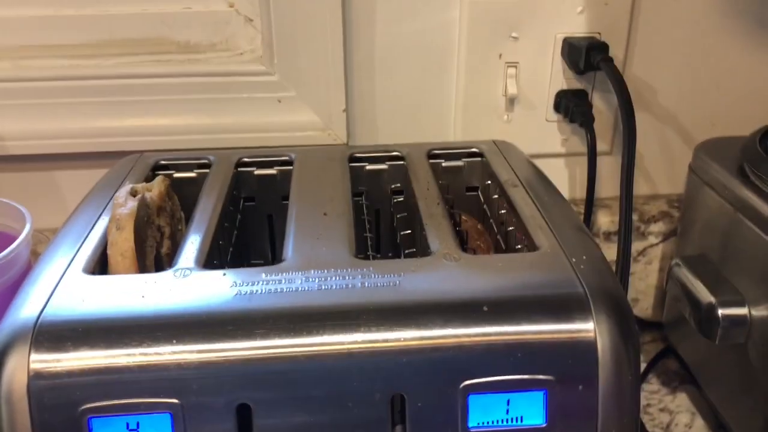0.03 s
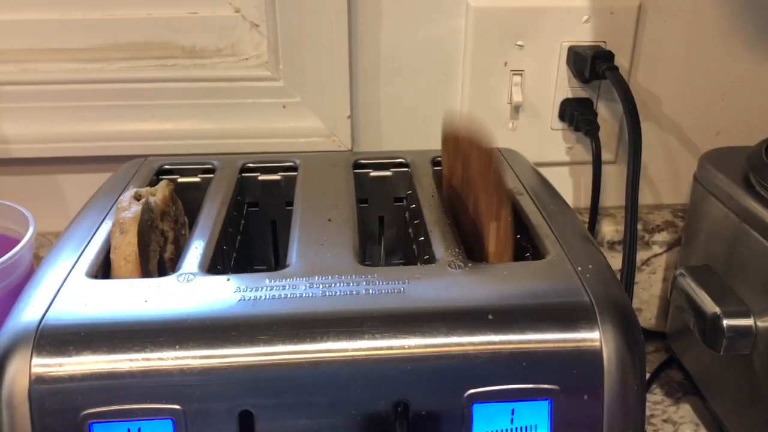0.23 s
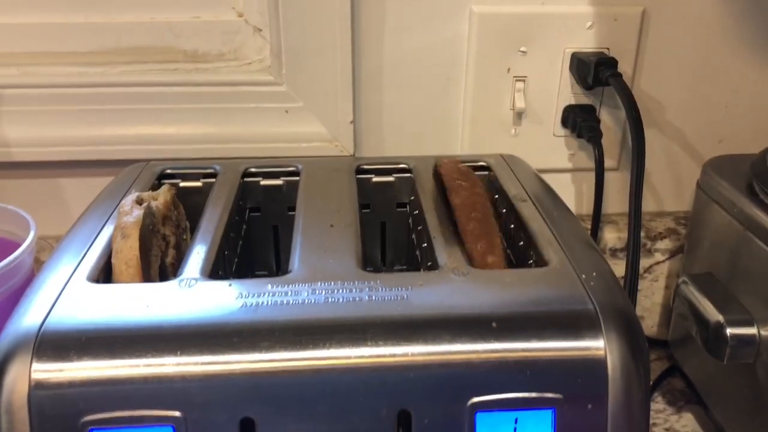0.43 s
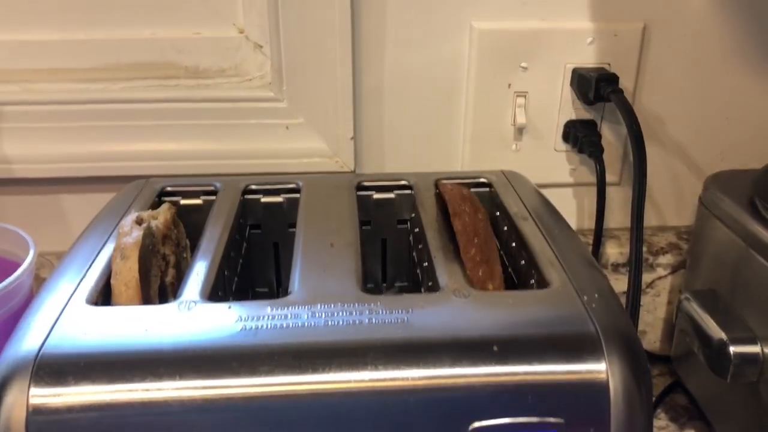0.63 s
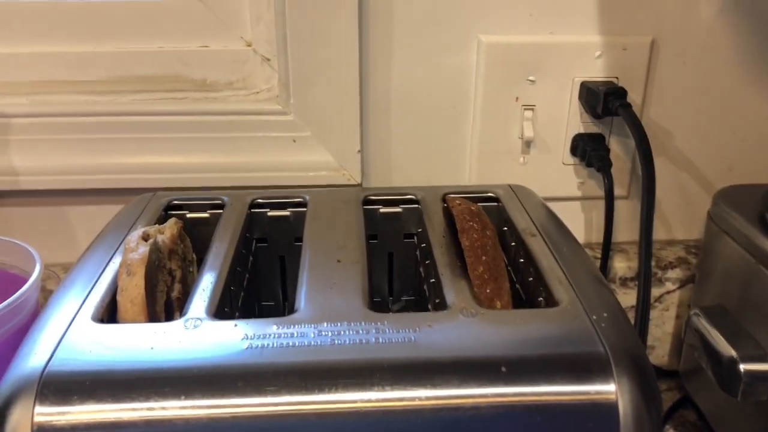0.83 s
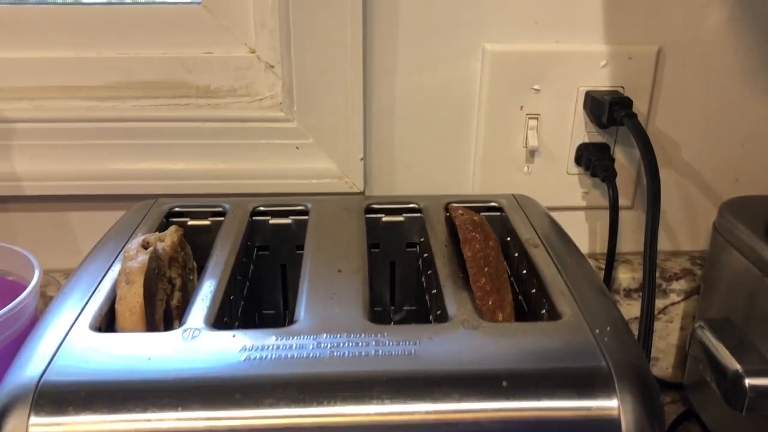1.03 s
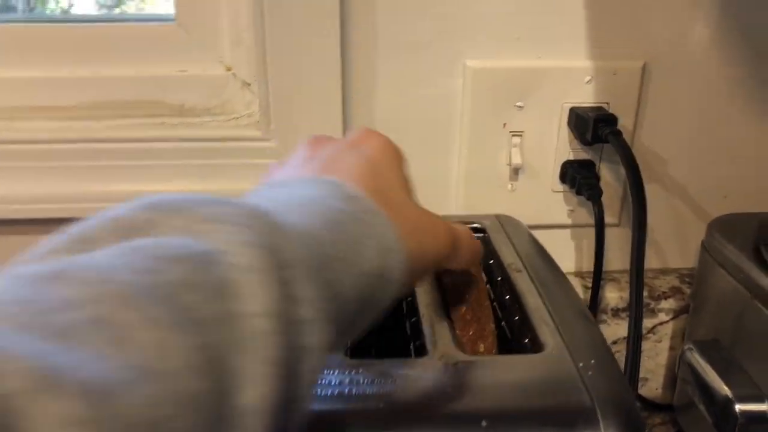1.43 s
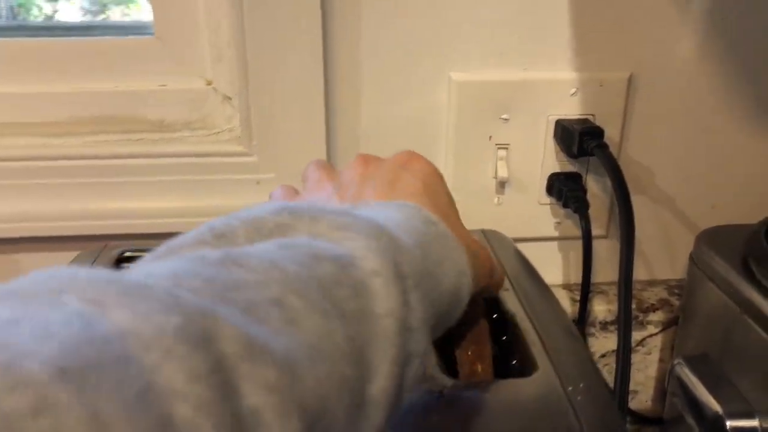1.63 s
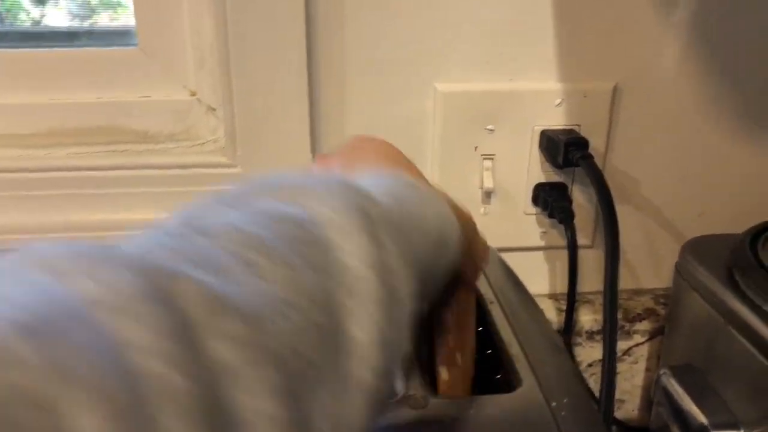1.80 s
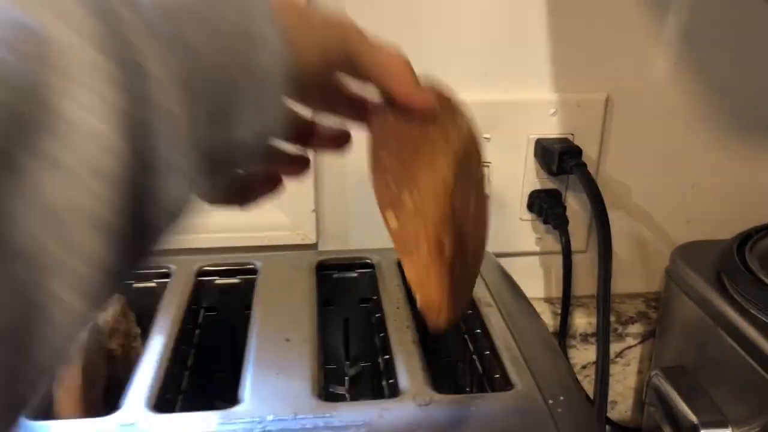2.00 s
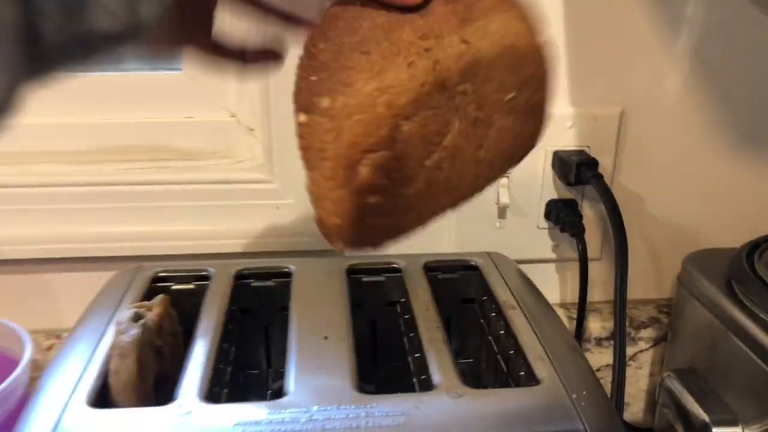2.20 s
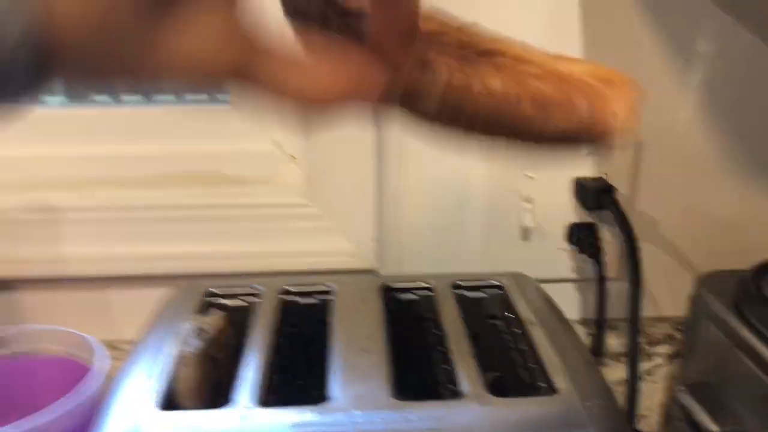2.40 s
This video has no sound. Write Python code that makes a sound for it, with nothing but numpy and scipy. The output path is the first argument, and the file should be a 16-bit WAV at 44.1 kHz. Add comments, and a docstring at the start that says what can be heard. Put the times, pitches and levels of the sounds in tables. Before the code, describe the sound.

A pop-up toaster clicks and clatters, followed by light scraping as toast is removed.

```python
"""A steel pop-up toaster pops in a quiet kitchen. The latch clicks, the sprung carriage shoots up,
hits its stop and bounces, and the slice drops back on the rack. Each contact is a crack and a dying
chatter that set the case and wires ringing. After a few soft bumps and a faint high whistle, the toast
is pulled out, scraping along the slot. A low rumble, a hum and a hiss lie underneath."""
import sys
import numpy as np
from scipy import signal
from scipy.fft import rfft, irfft, next_fast_len
from scipy.io import wavfile

SR = 44100
rng = np.random.default_rng(int(sys.argv[2]) if len(sys.argv) > 2 else 0)


def store_pcm(level_fs):
    """Save levels as 16-bit WAV."""
    pcm = np.round(np.clip(level_fs, -1, 1) * 32767).astype(np.int16)
    wavfile.write(sys.argv[1], SR, np.atleast_2d(pcm).T)


N = 112454
TIME = np.arange(N) / SR


def from_db(db):
    return 10 ** (np.asarray(db) / 20)


def at_pitch(points, hz):
    """Read between a table's rows, giving every octave equal room."""
    pitches, values = np.transpose(points)
    return np.interp(np.log(np.maximum(hz, 1)), np.log(pitches), values)


def unit_energy(x):
    return x / np.sqrt(np.sum(x ** 2) + 1e-20)


def swell(t, rise_s, fade_s):
    """Rise in a straight line, then fall 60 dB every fade_s."""
    return np.clip(t / max(rise_s, 1e-5), 0, 1) * from_db(-60 * np.maximum(t - rise_s, 0) / fade_s)


def shape_tone(x, points):
    """Turn lows and highs up or down along (pitch_hz, gain_db) points."""
    n = 2 * next_fast_len(len(x))
    gain = from_db(at_pitch(points, np.fft.rfftfreq(n, 1 / SR)))
    cepstrum = irfft(np.log(gain))
    # minimum phase: nothing rings before the hit
    cepstrum[1:n // 2] *= 2
    cepstrum[n // 2 + 1:] = 0
    return irfft(rfft(x, n) * np.exp(rfft(cepstrum)))[:len(x)]


# tone of the room's rumble and hiss: pitch_hz, gain_db
RUMBLE_TONE = [(20, -16.5), (45, -11), (70, -8), (100, -1), (140, -7.5), (200, -4.5), (240, -7), (275, -16),
               (335, -2.5), (480, -14.5), (700, -18), (1500, -26.5), (3000, -32), (8000, -37.5),
               (15500, -41.5)]
HISS_TONE = [(500, -11.5), (2000, 0), (5000, 2), (10000, 0), (13000, 1), (16000, -0.5)]
# the hiss over time: time_s, level_db
HISS_LEVELS = [(0, -91), (.2, -78), (.9, -75), (1.15, -75.5), (1.5, -73.5), (1.7, -73.5), (2.2, -74.5),
               (2.55, -75)]

def room_tone(rumble_db=-37, hum_hz=246, hum_db=-69):
    """Low rumble, a weak mains hum, and a hiss that is a little stronger after the pop."""
    rumble = from_db(rumble_db) * shape_tone(rng.standard_normal(N), RUMBLE_TONE)
    hiss_db = np.interp(TIME, *np.transpose(HISS_LEVELS))
    hiss = from_db(hiss_db) * shape_tone(rng.standard_normal(N), HISS_TONE)
    hum = from_db(hum_db) * np.sqrt(2) * np.sin(2 * np.pi * hum_hz * TIME)
    return rumble + hiss + hum


# the six pitches, low to high, at which a contact's levels are set: pitch_hz
CONTACT_PITCHES = [90, 300, 1300, 3000, 6000, 12000]

def contacts(rows, crack, rough_db, size=16384):
    """The push of parts meeting: one sharp crack inside a burst of tiny, uneven hits."""
    out = np.zeros(N + size)
    for start_s, rise_s, fade_s, *levels in rows:
        envelope = swell(TIME[:size], rise_s, fade_s)
        force = envelope * rng.standard_normal(size) / 2
        force *= from_db(rough_db * np.minimum(rng.exponential(1, size), 4))
        force[int(rise_s * SR) + 1] += crack
        force = unit_energy(force) * np.linalg.norm(envelope)
        start = int(start_s * SR)
        out[start:start + size] += shape_tone(force, list(zip(CONTACT_PITCHES, levels)))
    return out[:N]


def ringing_note(t, pitch_hz, boost_db, fade_s):
    """A dying note that boosts a push at its own pitch by boost_db."""
    rate = np.log(1000) / fade_s
    return from_db(boost_db) * 2 * rate / SR * np.exp(-rate * t) * np.sin(2 * np.pi * pitch_hz * t)


def dense_ring(t, levels, fades):
    """Countless notes blur into noise that dies at its own rate in each band."""
    out, edges_hz = 0, np.geomspace(35, 18000, 15)
    for low, high in zip(edges_hz, edges_hz[1:]):
        hz = np.sqrt(low * high)
        band_filter = signal.butter(2, [low, high], "band", fs=SR, output="sos")
        band = signal.sosfilt(band_filter, rng.standard_normal(len(t)))
        band = unit_energy(band * swell(t, 0.00021, at_pitch(fades, hz)))
        out += band * np.sqrt(2 * (high - low) / SR) * from_db(at_pitch(levels, hz))
    return out


# how strongly the panels and the kitchen ring: pitch_hz, level_db
PANEL_LEVELS = [(100, 2), (1500, -4.5), (12000, -3)]
KITCHEN_LEVELS = [(100, -8), (400, 1.5), (1500, -0.5), (5000, -7.5), (12000, -10)]
# how long they ring: pitch_hz, fade_s
PANEL_FADES = [(100, .12), (400, 0.083), (2000, 0.019), (12000, 0.081)]
KITCHEN_FADES = [(100, .5), (400, 0.31), (1500, 0.39), (5000, 0.35), (9000, 0.29), (15000, 0.34)]
# overall tone of the steel case: pitch_hz, gain_db
CASE_TONE = [(25, -32.5), (60, -1.5), (105, -1.5), (140, -8.5), (210, -11.5), (330, 1), (500, -9.5),
             (700, -2), (1500, -2), (2100, -2.5), (3500, 1.5), (8500, 0), (11000, -3), (15800, -6),
             (18000, -19.5)]
# notes of the case and slot: pitch_hz, boost_db, fade_s
CASE_NOTES = [(212.1, 6, 0.27), (323.2, 10, 0.33), (343.8, 11, 0.13), (362.2, 17, 0.36), (399, 9, 0.46),
              (658, 4.5, .3), (968, 7, .38), (1361, 3.5, 0.53), (1544, 9.5, 0.38), (1834, 7, 0.34),
              (3757, 2.5, .3), (5090, 10.5, 0.44), (6920, 9, 0.18), (7763, 6.5, .3)]

def toaster_body(tick_db=-3.5):
    """A tap on one spot sets off a short clack (tick, panels) and a long ring (case, kitchen)."""
    t = TIME[:SR]
    clack = dense_ring(t, PANEL_LEVELS, PANEL_FADES)
    clack[0] += from_db(tick_db)
    notes = sum(ringing_note(t, *row) for row in CASE_NOTES)
    echo = dense_ring(t, KITCHEN_LEVELS, KITCHEN_FADES)
    return shape_tone(clack, CASE_TONE), shape_tone(echo, CASE_TONE) + notes


# the latch letting go: start_s, rise_s, fade_s, then level_db at each of CONTACT_PITCHES
LATCH_CLICK = [(.1993, 0.00089, .014, -38, -27, -13.5, -11.5, -15, -22)]
# its bright tone: pitch_hz, gain_db
LATCH_TONE = [(650, -2.5), (1000, -3.5), (1500, 1.5), (2100, 2), (4300, 0.5), (7000, 0), (9200, -7),
              (14000, 1.5)]
# its own notes: pitch_hz, boost_db, fade_s
LATCH_NOTES = [(220, 16, 0.053), (400, 17.5, .13), (1510, 9, .08), (2590, 0.5, .12), (3150, -5.5, 0.21),
               (3620, 1.5, .1), (4500, 3.5, .08)]

def latch(ring_db=-6.5):
    """The small latch lets go with a dry click that barely rings the case."""
    clack, ring = toaster_body()
    notes = sum(ringing_note(TIME[:SR], *row) for row in LATCH_NOTES)
    force = shape_tone(contacts(LATCH_CLICK, crack=.5, rough_db=2.5), LATCH_TONE)
    return signal.fftconvolve(force, clack + notes + from_db(ring_db) * ring)[:N]


# carriage and falling slice: start_s, rise_s, fade_s, then level_db at each of CONTACT_PITCHES
HARD_HITS = [ (.2443, 0.00056, 0.11, -42, -18, -12.5, -18, -22.5, -31),
             (.2578, 0.00023, 0.017, -11.5, -18.5, -12.5, -12.5, -7.5, -3),
             (.2705, 0.0021, 0.12, -22, -17, -15, -16.5, -17.5, -13.5),
             (.2825, 0.0013, 0.31, -33, -24, -24.5, -28.5, -20, -15.5),
             (.3293, 0.0002, 0.029, -30, -17, -22, -21, -20, -23),
             (.3495, 0.00076, .100, -29, -13, -15.5, -15.5, -17.5, -17),
             (.3524, .0001, 0.0035, -23.5, -7.5, -13.5, -12.5, -3, 3.5),
             (.4108, .0020, 0.03, -15.5, -27.5, -9.5, -19, -14, -7),
             (.4270, 0.0026, .025, -18, -17, -16, -17.5, -13, -20),
             (.5020, 0.0014, 0.16, -31, -19, -23.5, -20, -22, -20.5),
             (.5055, 0.00043, 0.0067, -30, -10.5, -5.5, -15.5, -15, -7),
             (.5240, 0.0022, 0.058, -23, -23.5, -18.5, -19.5, -52.5, -38),
             (.5610, 0.0059, 0.084, -37, -22.5, -26.5, -30, -31, -29.5),
             (.5840, 0.001, 0.013, -22, -20, -17, -24, -27, -61),
             (.6220, 0.0021, 0.3, -38, -32.5, -51, -56, -43.5, -48),
             (.7130, 0.0094, 0.066, -59, -35.5, -32.5, -37.5, -52, -56),
             (.7320, 0.0038, 0.2, -41, -40, -37.5, -51, -51, -58),
             (.8140, 0.0053, 0.043, -64, -45, -57, -53, -56, -73)]
# bumps, then toast scraping the slot, then crumbs: same columns
SOFT_TOUCHES = [ (.9080, 0.0024, 0.056, -45, -31, -38, -52, -59, -58),
                (.9282, 0.00081, 0.051, -58, -31.5, -38.5, -48, -51.5, -62),
                (.9700, 0.019, 0.063, -66, -47, -62, -53.5, -55, -55.5),
                (.9950, 0.0034, 0.022, -69, -36.5, -35, -76, -59, -71),
                (1.634, .030, .25, -67, -47, -55, -66, -68, -72),
                (1.783, 0.004, 0.2, -51, -48, -37.5, -44, -50, -53),
                (1.805, 0.0025, 0.064, -47, -42.5, -29.5, -35, -39, -46),
                (1.850, 0.014, 0.45, -60, -37, -41.5, -51, -50, -57.5),
                (1.884, 0.0037, 0.073, -48, -31, -40, -40, -60, -62),
                (1.948, 0.0032, 0.21, -76, -51, -43.5, -49.5, -61, -56),
                (1.982, 0.0045, 0.065, -58, -33, -43.5, -45, -42.5, -42.5),
                (2.005, 0.0057, 0.21, -79, -34, -45, -59, -73, -69),
                (2.316, .0005, .006, -62, -60, -54, -62, -56, -57),
                (2.4487, 0.00057, .006, -70.5, -65, -62, -65, -51, -54),
                (2.4647, 0.00057, .01, -70, -74, -59.5, -54, -50.5, -49.5),
                (2.534, .0005, .006, -70, -65, -62, -65, -51, -52)]

def clatter(spots=3):
    """Hits and touches land in turn on a few spots, each ringing a little differently."""
    out = 0
    for spot in range(spots):
        hits = contacts(HARD_HITS[spot::spots], crack=1.1, rough_db=5.5)
        touches = contacts(SOFT_TOUCHES[spot::spots], crack=1.22, rough_db=5)
        clack, ring = toaster_body()
        out += signal.fftconvolve(hits + touches, clack + ring)[:N]
    return out


def single_notes(rows, rise_s):
    """One pure, fading note for each row."""
    out = 0
    for start_s, pitch_hz, level_db, fade_s in rows:
        t = TIME - start_s
        out += from_db(level_db) * swell(t, rise_s, fade_s) * np.sin(2 * np.pi * pitch_hz * t)
    return out


# feet on the counter: start_s, pitch_hz, level_db, fade_s
FOOT_KNOCKS = [(.2445, 305.2, -23, 0.055), (.263, 72, -43, .2), (.428, 204, -55.5, 0.31),
               (.503, 208.4, -46, 0.33), (.928, 210.7, -49.5, 0.36)]

def foot_knocks():
    """The toaster's feet knock dully on the counter."""
    return single_notes(FOOT_KNOCKS, rise_s=0.002)


# ringing guard wires: start_s, pitch_hz, level_db, fade_s
WIRE_PINGS = [(.735, 8365, -56, .15), (1.805, 1570, -45, .11), (1.806, 8730, -45, .07),
              (1.807, 7140, -49.5, 0.1), (1.884, 5050, -49, 0.064), (1.984, 4730, -49, .04)]

def wire_pings():
    """The guard wires ping as the toast brushes them."""
    return single_notes(WIRE_PINGS, rise_s=0.0038)


# the whistle's two tones: pitch_hz, width_hz, level_db
WHISTLE_TONES = [(13170, 110, -63.5), (7060, 130, -73.5)]

def whistle(start_s=1.388, rise_s=0.049, fade_s=0.41):
    """Narrow bands of noise swell and fade as a faint, thin whistle."""
    out = 0
    for pitch_hz, width_hz, level_db in WHISTLE_TONES:
        radius = np.exp(-np.pi * width_hz / SR)
        feedback = [1, -2 * radius * np.cos(2 * np.pi * pitch_hz / SR), radius ** 2]
        band = signal.lfilter([1], feedback, rng.standard_normal(N))
        out += from_db(level_db) * np.sqrt(N) * unit_energy(band)
    return out * swell(TIME - start_s, rise_s, fade_s)


def scene():
    """All the sounds added into one channel."""
    details = foot_knocks() + wire_pings() + whistle()
    return (latch() + clatter() + details + room_tone())[None]


def record(dry, ceiling=1.15, cutoff_hz=16000):
    """Round off the tallest peaks and cut the highest treble steeply."""
    rounded = dry / (1 + (dry / ceiling) ** 4) ** .25
    return signal.sosfilt(signal.ellip(12, .1, 80, cutoff_hz, fs=SR, output="sos"), rounded)


dry = scene()
out = record(dry)
store_pcm(out)
```